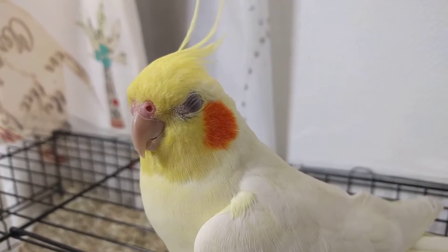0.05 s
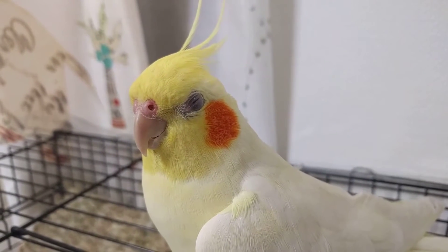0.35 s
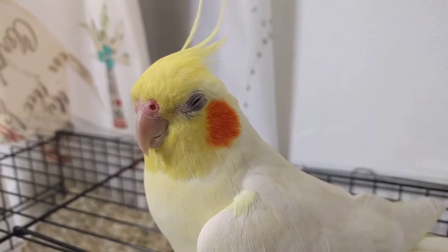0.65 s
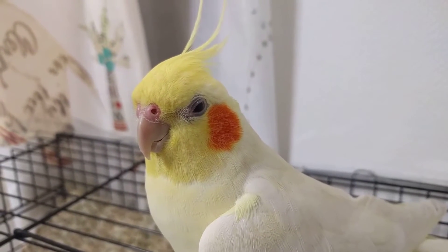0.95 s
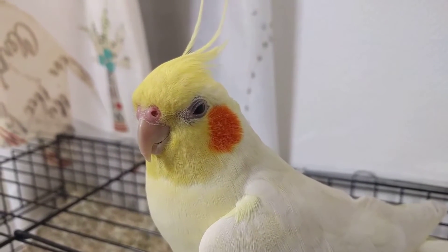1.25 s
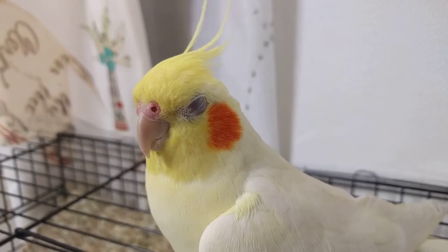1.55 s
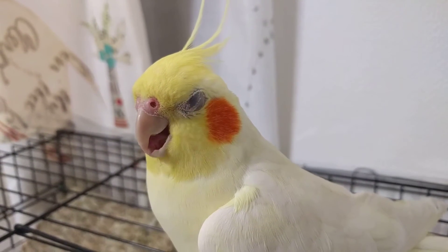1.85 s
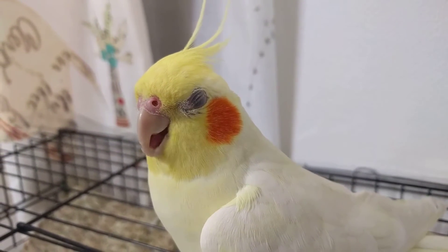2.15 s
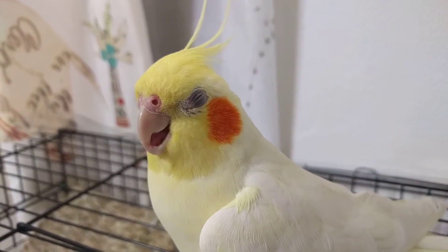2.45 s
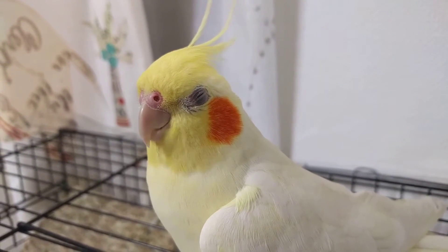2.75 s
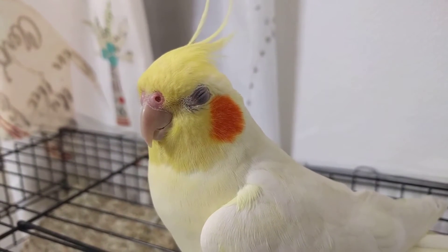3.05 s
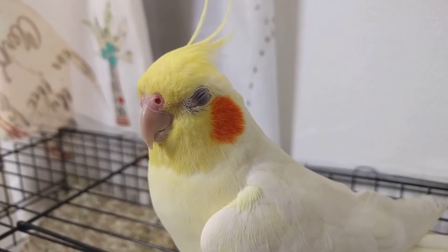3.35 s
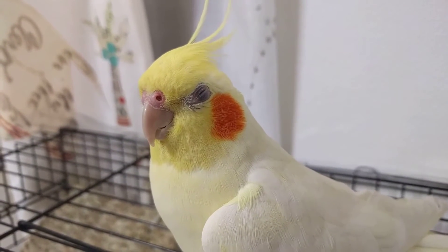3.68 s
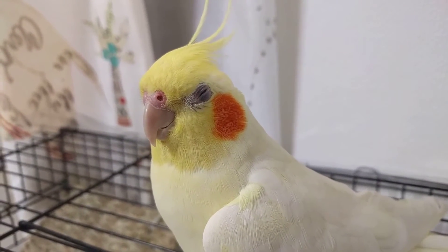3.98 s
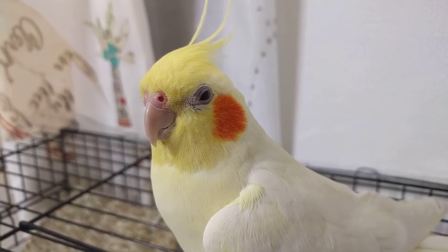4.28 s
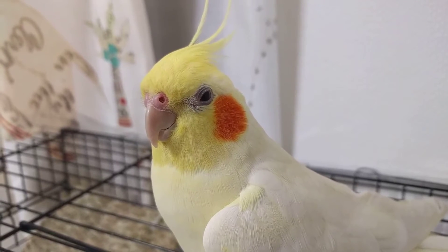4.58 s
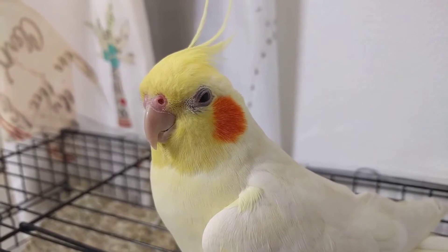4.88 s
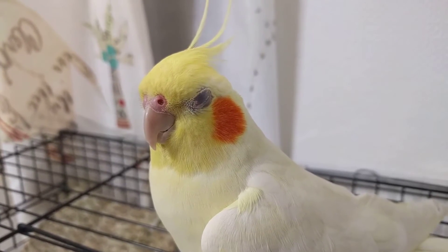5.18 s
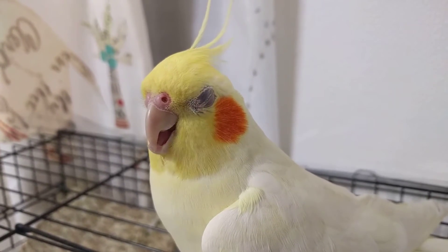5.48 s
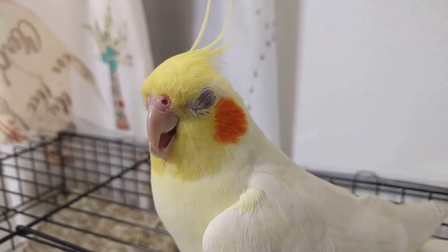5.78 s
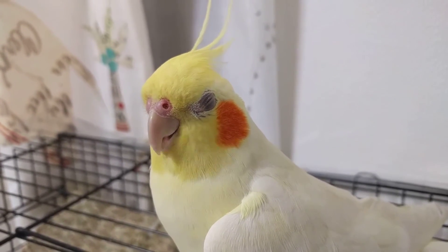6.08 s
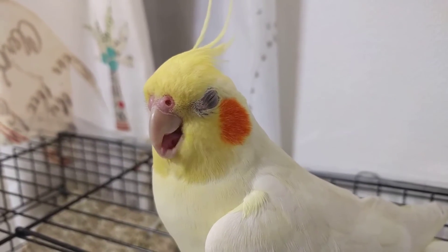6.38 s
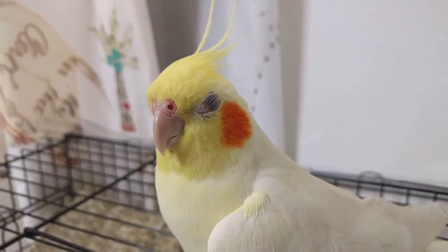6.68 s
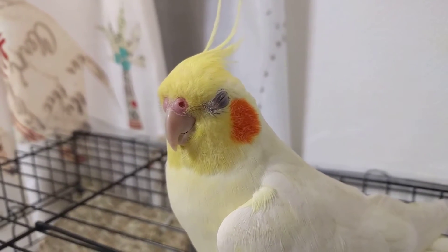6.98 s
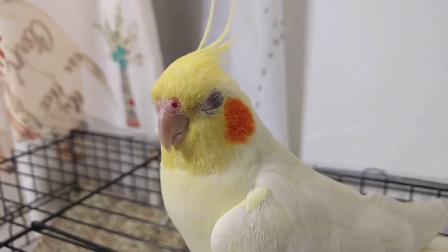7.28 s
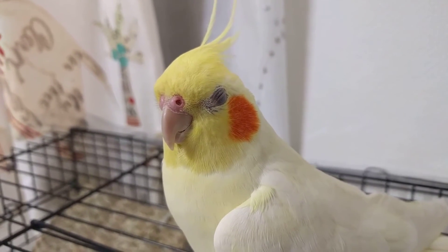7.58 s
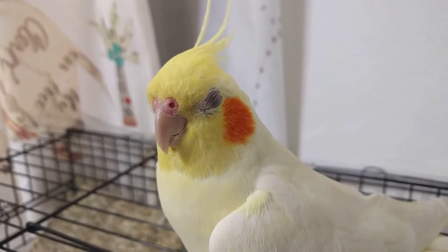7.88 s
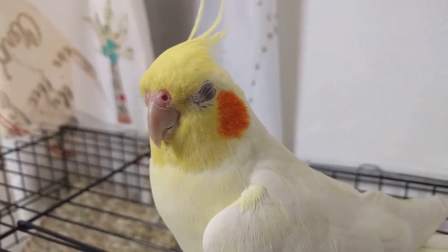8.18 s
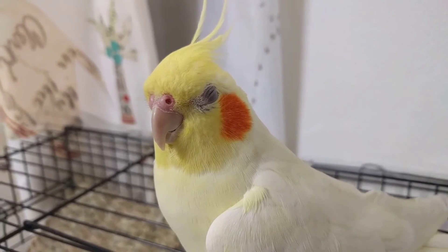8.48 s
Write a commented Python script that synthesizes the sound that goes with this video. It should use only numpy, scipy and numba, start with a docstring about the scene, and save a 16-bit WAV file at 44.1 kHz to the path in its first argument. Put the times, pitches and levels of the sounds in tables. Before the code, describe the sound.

A cockatiel grinds its beak close to the microphone in a small, hard-walled room. The sound is soft and dry: buzzy rasps, rough grates and high, slightly rising scrapes, each about a tenth of a second or shorter, mixed with tiny sharp clicks. After a few faint strokes, a run of rasps starts at about 0.7 seconds, followed by scrapes and a click around 1.6. The grinding eases briefly after 2.2 seconds, then resumes from 2.7 to 4.4 with squeakier rasps and more clicks. After a short pause, the busiest bout runs from about 4.9 to 6.7 seconds, with a sharp click near 6.3. More rasps and clicks come between 7 and 7.7, then only sparse strokes and a last squeaky rasp around 8.6. A brief room echo follows each stroke, and a low hum and faint hiss continue throughout.

```python
"""Small, hard-walled room: a drowsy cockatiel grinds its beak close to the microphone.
The lower bill sticks and slips over the ridges of the upper one (pitched rasps, rough grates),
scrapes with a rising mouth ring and snaps off the edge (clicks).
The room answers briefly over a low hum and a faint hiss."""
import sys
import numpy as np
from scipy import signal
from scipy.fft import rfft, irfft, next_fast_len
from scipy.io import wavfile
from numba import njit

SR = 44100
rng = np.random.default_rng(int(sys.argv[2]) if len(sys.argv) > 2 else 0)


def transcribe(u):
    """Save the signal u as a 16-bit wav file named by the first command-line argument.

    u: samples, shape (n,) or (channels, n), limited to [-1, 1]; the rate is SR.
    q: integer samples, one column per channel.
    """
    v = np.clip(np.atleast_2d(u).T, -1, 1)
    q = np.round(v * 32767).astype(np.int16)
    wavfile.write(sys.argv[1], SR, q)


N = 385434

# room air spectrum: f/Hz, relative level/dB
AIR_SPECTRUM = [(25, -13.5), (75, -4.5), (115, -9.5), (215, -13), (370, -18.5), (760, -19), (1400, -28),
                (1900, -25), (2600, -28.5), (5000, -32.5), (6600, -20.5), (7500, -60), (8400, -36),
                (15500, -37.5)]
# hum bands: f/Hz, width/Hz, level/dB
HUM_BANDS = [(59.06, 5.2, -61), (91.8, 2.7, -70.5), (148.5, 10.6, -70.5), (201.5, 5.6, -77),
             (226.7, 5.1, -73.5), (287.5, 67, -69)]
# room decay: f/Hz, T60/s
ROOM_T60 = [(500, 0.57), (1500, 0.41), (3500, 0.32), (7000, 0.28), (13000, 0.23)]
# beak and mouth response: f/Hz, gain/dB
BEAK_RESPONSE = [(200, -39), (600, -14), (1150, -8), (1500, -10.5), (2000, -7), (2600, -2.5), (3400, -1),
                 (4400, -3), (5700, -12.5), (6900, -8), (8200, -20), (11000, -28.5), (16000, -39)]
# added response for even slips: f/Hz, gain/dB
SQUEAK_RESPONSE = [(600, -16), (1280, -7.5), (2000, -1.5), (2900, 8), (5000, 6), (9000, -5)]
# dry cracks: t/s, level/dB
CRACK_EVENTS = [(2.573, -61.5), (5.255, -50.5), (5.953, -48), (7.371, -52), (7.394, -42.5)]
# double clicks: t/s, level/dB, lower ring f/Hz
CLACK_EVENTS = [(1.821, -41.5, 3430), (3.075, -40, 3070), (5.295, -41, 3050), (6.531, -41, 3110)]
# single clicks: t/s, length/s, level/dB, ring f/Hz
CLICK_EVENTS = [ (0.029, 0.0075, -42.5, 3570), (.292, .012, -57, 7100), (0.901, 0.027, -49, 900),
                (1.21, 0.013, -51, 6740), (1.592, 0.016, -34, 6700), (2.086, .004, -48.5, 2070),
                (2.191, 0.0095, -47.5, 3340), (2.815, .014, -39, 3130), (2.852, 0.021, -34.5, 6050),
                (3.927, 0.0088, -31.5, 6490), (4.16, 0.015, -38.5, 3720), (5.028, 0.007, -38, 3080),
                (5.067, .011, -33.5, 6120), (5.255, .017, -41.5, 6660), (6.297, 0.008, -29, 6510),
                (6.306, .011, -39, 6600), (7.141, .028, -42, 6280), (7.37, 0.011, -40.5, 7000),
                (7.395, 0.005, -33, 6170), (7.664, 0.0036, -53, 6860)]
# unpitched strokes: t/s, length/s, level/dB, treble/dB
GRATE_STROKES = [ (.627, 0.025, -53, 7), (1.241, 0.043, -49.5, 16), (1.491, 0.055, -39.5, 14.5),
                 (1.853, 0.078, -46, 7), (1.992, 0.052, -55.5, 1), (2.062, 0.056, -46.5, 13),
                 (2.404, 0.14, -62, 24), (2.511, 0.04, -60, 8), (2.577, 0.0059, -48.5, 20),
                 (2.603, 0.027, -52.5, 5), (2.683, 0.031, -51, 0), (2.748, .052, -38.5, 21),
                 (3.037, 0.056, -54, 10), (3.089, 0.059, -48, 6), (3.524, 0.08, -50, -1),
                 (3.842, 0.02, -50.5, -10), (3.884, .018, -46.5, -8), (4.167, 0.038, -47, -7),
                 (4.24, 0.059, -41.5, 19.5), (4.331, 0.13, -54, 11), (4.887, 0.02, -50, 6),
                 (4.952, 0.072, -43.5, 13), (5.329, 0.078, -45, 13), (5.936, 0.054, -42, 15.5),
                 (6.55, 0.063, -46.5, 15), (8.063, 0.053, -50, 2)]
# ringing strokes: t/s, length/s, level/dB, start f/Hz, upper resonance and grit/dB
SCRAPE_STROKES = [ (.003, 0.091, -46.5, 3240, -1.5), (0.887, 0.063, -40, 3540, -2),
                  (1.248, 0.033, -46, 3710, -4), (1.554, 0.041, -35, 3560, -4.5),
                  (1.588, 0.074, -43, 4120, -11), (2.777, 0.088, -37.5, 3340, -10),
                  (3.254, 0.022, -40.5, 3400, 2), (3.528, 0.077, -38, 3390, -7.5),
                  (3.964, 0.034, -39, 3490, -30), (4.167, 0.07, -43.5, 2910, 1),
                  (4.222, 0.051, -35, 3500, -7), (4.908, 0.086, -44.5, 3450, -5.5),
                  (5.097, 0.024, -37.5, 3620, -8), (5.574, 0.066, -42.5, 2870, 10),
                  (5.602, 0.068, -36, 3660, -5.5), (6.187, 0.064, -37.5, 3200, -5),
                  (6.236, 0.05, -33.5, 3780, -12.5), (6.331, .031, -37, 3530, -30),
                  (7.183, 0.07, -38.5, 3470, -28), (7.695, 0.02, -42, 3300, 7),
                  (8.076, .09, -47, 3480, -5.5)]
# pitched strokes: t/s, length/s, level/dB, slip rate/Hz, treble/dB
RASP_STROKES = [ (0.336, 0.077, -58, 595, -2), (0.42, .09, -55.5, 411.4, -3),
                (0.668, 0.052, -35, 423.5, 16), (0.759, 0.052, -40, 425, 13), (0.873, .024, -42, 416, -1),
                (.896, 0.059, -40.5, 405.7, 7), (0.969, 0.11, -40, 647, 5), (1.054, .11, -39.5, 631.5, -1),
                (1.32, 0.027, -57.5, 495, -5), (1.401, 0.091, -48.5, 618, -5),
                (1.623, 0.084, -43.5, 420, 9), (1.896, 0.081, -44, 627, -3), (2.878, 0.1, -41.5, 426, 6),
                (3.173, 0.093, -51, 535.4, 3), (3.412, 0.14, -44, 626.6, -4.5),
                (3.458, 0.074, -39, 923, 8.5), (3.642, 0.08, -37.5, 1050, -1.5),
                (3.707, 0.069, -43, 468.7, 3.5), (3.949, 0.11, -46, 405, 3.5),
                (5.1, .105, -43.5, 426.6, -1), (5.401, 0.079, -48, 584, -3), (5.48, 0.12, -48.5, 414, 9),
                (5.683, 0.085, -48, 639, -6), (5.793, 0.12, -39.5, 623.5, -0.5),
                (5.824, 0.066, -39.5, 914, -13), (5.875, 0.05, -43.5, 305.8, 0),
                (6.013, .08, -37.5, 1062, 1), (6.072, 0.092, -42.5, 511, 6), (6.327, 0.056, -42, 605, 4),
                (6.377, 0.034, -45.5, 407, 3), (6.599, 0.13, -48.5, 564.5, -4.5),
                (6.791, 0.061, -49, 413, -0.5), (6.983, .06, -49.5, 404, 6), (7.067, 0.09, -44.5, 628, -2),
                (7.171, 0.095, -41, 409.7, 6), (7.534, 0.06, -51, 413, -11), (8.54, 0.08, -48.5, 414, 3.5),
                (8.667, 0.086, -41.5, 931, -5), (8.676, 0.071, -42, 466, -14)]


def undb(db):
    """dB to gain."""
    return 10 ** (np.asarray(db) / 20)


def unit(x):
    """Scale to rms 1."""
    return x / np.sqrt(np.mean(x ** 2) + 1e-18)


def at_level(x, length_s, db):
    """Set the rms level, with all energy counted over length_s."""
    return x * undb(db) * np.sqrt(max(length_s, .002) * SR / (np.sum(x ** 2) + 1e-18))


def add(track, t_s, x):
    """Mix x in from t_s on."""
    i = max(int(t_s * SR), 0)
    track[i:i + len(x)] += x[:max(len(track) - i, 0)]


def colour(x, points):
    """Filter by (f/Hz, gain/dB) points."""
    hz, db = np.transpose(points)
    size = next_fast_len(len(x))
    f_hz = np.maximum(np.fft.rfftfreq(size, 1 / SR), 1)
    gain = undb(np.interp(np.log(f_hz), np.log(hz), db))
    return irfft(rfft(x, size) * gain, size)[:len(x)]


@njit
def bandpass(x, hz, width_hz):
    """State-variable band-pass, one centre per sample."""
    y, band, low = np.empty(len(x)), 0., 0.
    for i in range(len(x)):
        g = np.tan(np.pi * min(hz[i], .45 * SR) / SR)
        damping = width_hz / hz[i]
        v = (band + g * (x[i] - low)) / (1 + g * (g + damping))
        band, low = 2 * v - band, low + 2 * g * v
        y[i] = damping * v
    return y


def ring(x, hz, width_hz):
    """Steep resonance; hz is a constant or a curve."""
    hz = np.full(len(x), hz, dtype=float)
    return bandpass(bandpass(x, hz, float(width_hz)), hz, float(width_hz))


def background(air_db=-58.5):
    """Steady air; narrow noise bands give a wavering hum."""
    air = undb(air_db) * unit(colour(rng.standard_normal(N), AIR_SPECTRUM))
    hum = sum(undb(db) * unit(ring(rng.standard_normal(N), hz, width_hz))
              for hz, width_hz, db in HUM_BANDS)
    return air + hum


def room(x, direct_db=-.5, wet_db=-1.5, gap_s=.003, blur_s=.05):
    """Near surfaces reflect first, then the walls blur into a short tail."""
    t_s = np.arange(SR // 2) / SR
    f_hz = np.maximum(np.fft.rfftfreq(len(t_s), 1 / SR), 1)
    band_hz, t60_s = np.transpose(ROOM_T60)
    density = np.minimum(.0036 + (t_s / blur_s) ** 2, 1)
    echoes = rng.standard_normal(len(t_s)) * (rng.random(len(t_s)) < density) / np.sqrt(density)
    tail = 0
    for share, decay_s in zip(np.eye(len(band_hz)), t60_s):
        band = irfft(rfft(echoes) * np.interp(np.log(f_hz), np.log(band_hz), share), len(t_s))
        tail = tail + band * undb(-60 * t_s / decay_s)
    tail = tail * (t_s > gap_s)
    wet = signal.fftconvolve(x, tail / np.linalg.norm(tail))[:N]
    return undb(direct_db) * x + undb(wet_db) * wet


def slips(length_s, start_hz, end_hz, scatter, size_db, grit):
    """Stick-slip force: one pulse per slip, uneven in time and size, plus friction noise."""
    n = int(max(length_s, .002) * SR)
    chance = np.random.default_rng(rng.integers(2 ** 31))
    wander, jitter, size = chance.standard_normal((n, 3)).T
    cycles = np.cumsum(np.linspace(start_hz, end_hz, n)) / SR
    slip_cycles = np.cumsum(np.exp(scatter * wander / 3)) + scatter * jitter / 3
    slip_cycles -= slip_cycles[0]
    slip_samples = np.interp(slip_cycles[slip_cycles < cycles[-1]], cycles, np.arange(n))
    taps = slip_samples.astype(int)[:, None] + np.arange(-4, 5)
    offset = taps - slip_samples[:, None]
    pulses = np.sinc(offset) * np.sinc(offset / 5)  # band-limited
    pulses *= undb(size_db * size[:len(pulses), None])
    train = np.bincount(np.clip(taps, 0, n - 1).ravel(), pulses.ravel(), n)
    return unit(train) + grit * chance.standard_normal(n)


def press(x, rise, fall):
    """Contact pressure builds and lets go as powers of time; 10 ms of padding follow."""
    progress = np.linspace(0, 1, len(x))
    pressure = progress ** rise * (1 - progress) ** fall
    return np.pad(x * pressure, (0, SR // 100))


def disperse(x, bass_lag_s):
    """Bending waves carry treble faster than bass and smear each slip."""
    f_hz = np.fft.rfftfreq(len(x), 1 / SR)
    delay_s = bass_lag_s * np.exp(-f_hz / 5000)
    phase_rad = 2 * np.pi * np.cumsum(delay_s) * f_hz[1]
    return irfft(rfft(x) * np.exp(-1j * phase_rad), len(x))


def contact(x, ripple_db=5.5):
    """The contact point moves: each stroke has its own peaks and dips."""
    hz = np.geomspace(1700, 12000, num=30)
    gains_db = ripple_db * rng.standard_normal(len(hz))
    return colour(x, [(1300, 0), *zip(hz, gains_db)])


def rubbing(level_db=-72, swell_db=2, knots_per_s=14):
    """The bill keeps rubbing very lightly, in uneven swells."""
    knots = np.arange(0, N, SR / knots_per_s)
    swell = undb(swell_db * np.interp(np.arange(N), knots, rng.standard_normal(len(knots))))
    force = slips(N / SR, 500, 500, scatter=.9, size_db=8, grit=.98)
    hiss = ring(force, np.linspace(7540, 7300, len(force)), width_hz=1800)
    return undb(level_db) * unit(swell * np.resize(hiss, N))


def snap(length_s, db, hz, width_hz):
    """A quick run of slips rings one resonance and, faintly, the whole beak."""
    force = slips(length_s, 1800, 1793, scatter=.744, size_db=1, grit=1)
    force = press(force, rise=.3, fall=.61)
    tone = unit(ring(force, hz, width_hz))
    body = undb(-15.5) * unit(colour(force, BEAK_RESPONSE))
    return at_level(disperse(tone + body, bass_lag_s=.0015), length_s, db)


def clicks(drop_after_s=.0093):
    """The bill leaves an edge: one ring, a high catch then a lower ring, or a dry crack."""
    out = np.zeros(N)
    for t_s, length_s, db, hz in CLICK_EVENTS:
        add(out, t_s, snap(length_s, db, hz, width_hz=820))
    for t_s, db, lower_hz in CLACK_EVENTS:
        add(out, t_s, snap(length_s=.039, db=db, hz=4050, width_hz=400))
        add(out, t_s + drop_after_s, snap(length_s=.013, db=db + 2.5, hz=lower_hz, width_hz=400))
    for t_s, db in CRACK_EVENTS:
        add(out, t_s, snap(length_s=.01, db=db, hz=8800, width_hz=15000))
    return out


def stroke(length_s, start_hz, end_hz, scatter, rise, treble_db):
    """Even slips squeak, uneven ones grate; both sound through the beak."""
    rough = min(scatter / .12, 1)
    force = slips(length_s, start_hz, end_hz, scatter, size_db=.6 + 3 * rough, grit=.1 + .25 * rough)
    x = colour(press(force, rise, fall=.77), BEAK_RESPONSE)
    x = colour(x, [(hz, (1 - rough) * db) for hz, db in SQUEAK_RESPONSE])
    x = colour(x, [(4000, 0), (6200, treble_db), (9000, .5 * treble_db)])
    return disperse(contact(x), bass_lag_s=.0025)


def grates():
    """Rough, slowing strokes whose slips never lock into a pitch."""
    out = np.zeros(N)
    for t_s, length_s, db, treble_db in GRATE_STROKES:
        grate = stroke(length_s, start_hz=500, end_hz=450, scatter=.1675, rise=.64, treble_db=treble_db)
        add(out, t_s, at_level(grate, length_s, db))
    return out


def scrapes(closed_hz=4135, closing_tau_s=.07, swell_db_per_octave=22, upper_ratio=1.896):
    """Fine grit rings two mouth resonances, which rise as the bill closes."""
    out = np.zeros(N)
    for t_s, length_s, db, start_hz, upper_db in SCRAPE_STROKES:
        force = slips(length_s, 900, 900, scatter=1, size_db=3, grit=.36)
        age_s = np.arange(len(force)) / SR
        hz = closed_hz + (start_hz - closed_hz) * np.exp(-age_s / closing_tau_s)
        lower = unit(ring(force, hz, width_hz=280))
        swing = np.abs(signal.hilbert(lower))
        lower /= np.sqrt(2 + swing ** 2)  # friction limits the swing
        lower = unit(lower * undb(swell_db_per_octave * np.log2(hz / closed_hz)))
        overtone = undb(-36) * unit(ring(force, 3 * hz, width_hz=650))
        upper = unit(ring(force, upper_ratio * hz, width_hz=650))
        grit = undb(1.5) * unit(ring(force, np.linspace(2880, 7150, len(force)), width_hz=1650))
        body = undb(-20) * unit(colour(force, BEAK_RESPONSE))
        scrape = lower + overtone + undb(upper_db) * unit(upper + grit) + body
        add(out, t_s, at_level(press(scrape, rise=.7, fall=1), length_s, db))
    return out


def rasps(steady_hz=769, bend_per_octave_s=.826, firm_db=-40, scatter_growth_per_db=.14):
    """Pitched strokes, buzz to squeak: firm, fast slips are most even; slow ones sag, fast ones climb."""
    out = np.zeros(N)
    for t_s, length_s, db, hz, treble_db in RASP_STROKES:
        firm_scatter = .062 * (420 / hz) ** 2.5
        scatter = firm_scatter * np.exp(scatter_growth_per_db * (firm_db - db))
        bend = bend_per_octave_s * length_s * np.log2(hz / steady_hz)
        start_hz, end_hz = hz * (1 - bend / 2), hz * (1 + bend / 2)
        rasp = stroke(length_s, start_hz, end_hz, scatter, rise=.71, treble_db=treble_db)
        add(out, t_s, at_level(rasp, length_s, db))
    return out


def scene():
    """The beak in its room, mono."""
    beak = rasps() + grates() + scrapes() + clicks() + rubbing()
    return (room(beak) + background())[None]


def record(dry):
    """Microphone: drops the deepest bass, cuts the top."""
    low_hz, top_hz = 45, 15780
    highpass = signal.butter(4, low_hz, "high", fs=SR, output="sos")
    lowpass = signal.ellip(10, .2, 70, top_hz, fs=SR, output="sos")
    return signal.sosfilt(lowpass, signal.sosfilt(highpass, dry))


dry = scene()
out = record(dry)
transcribe(out)
```